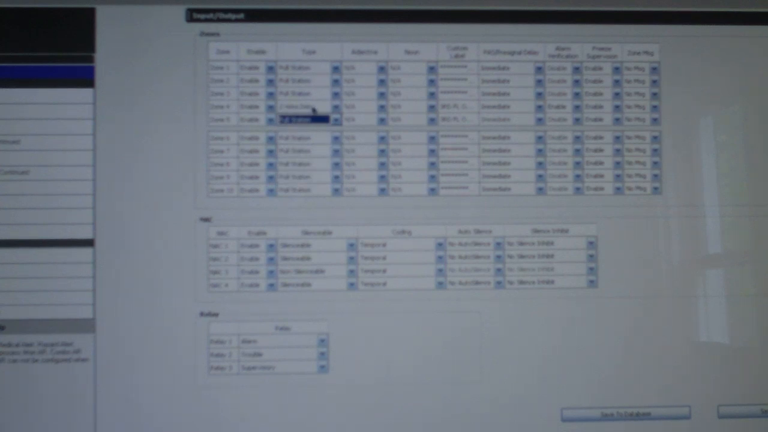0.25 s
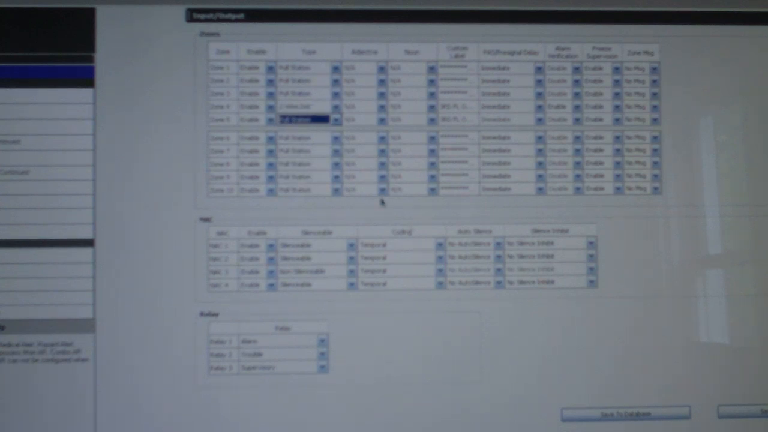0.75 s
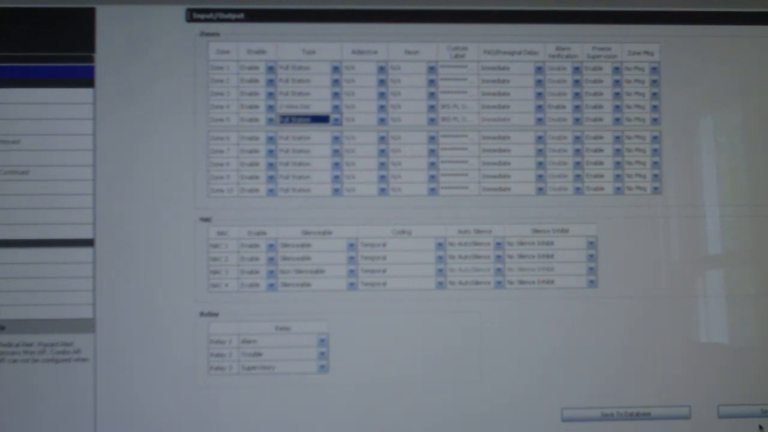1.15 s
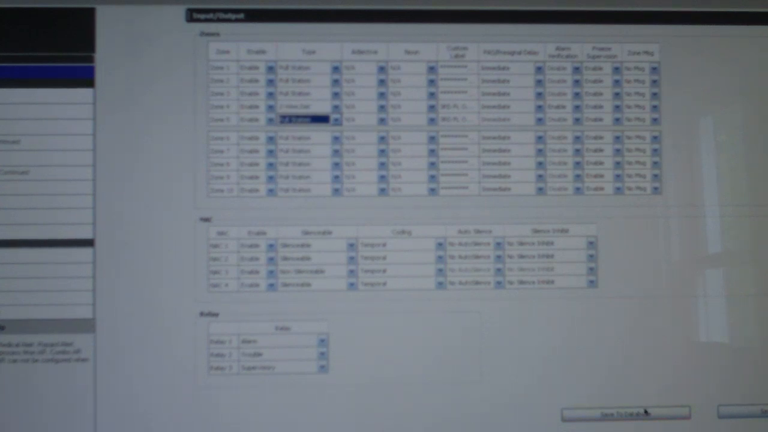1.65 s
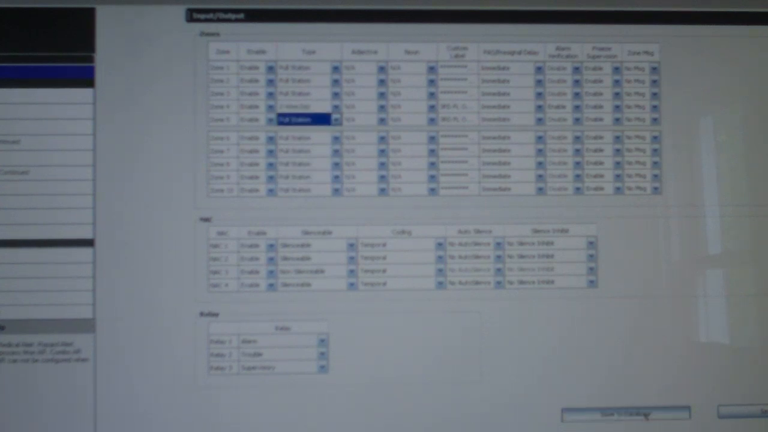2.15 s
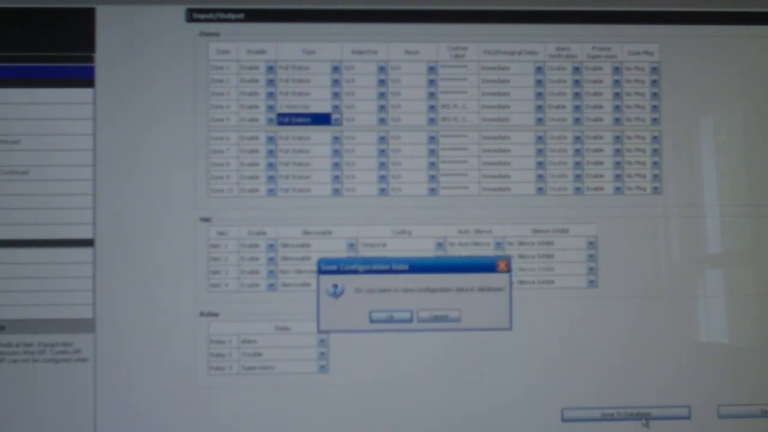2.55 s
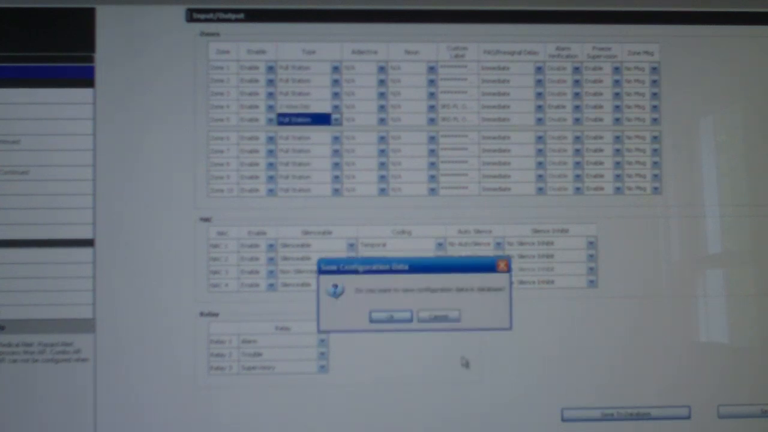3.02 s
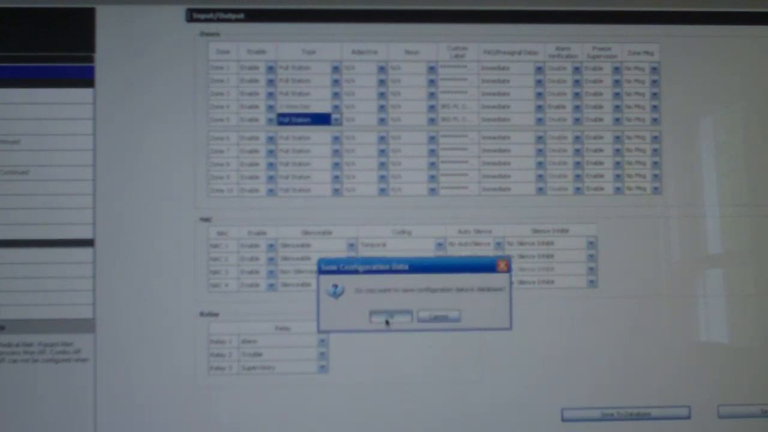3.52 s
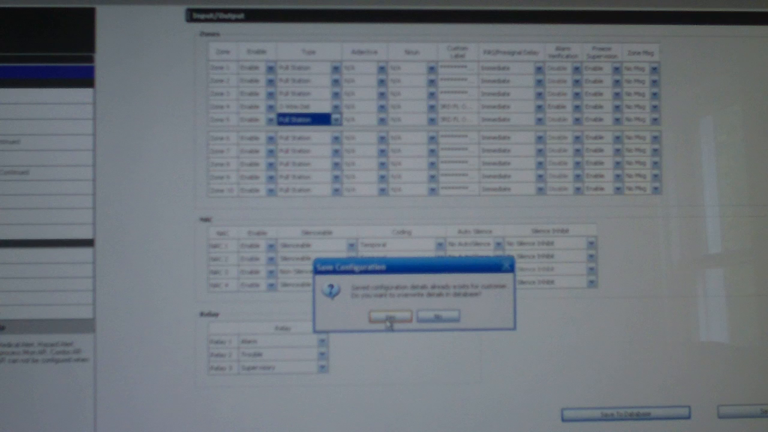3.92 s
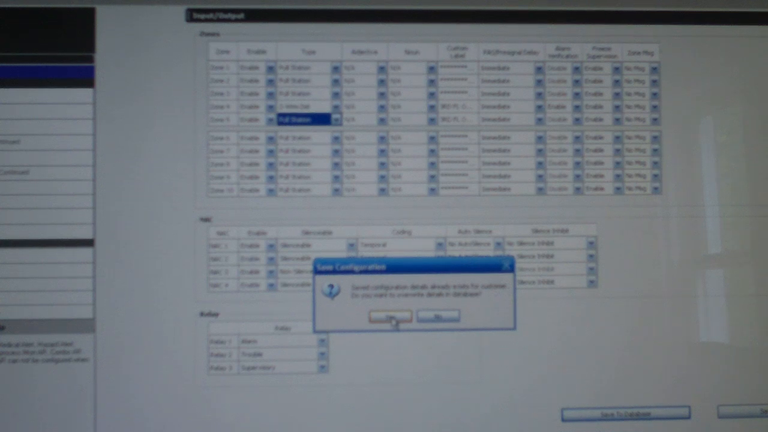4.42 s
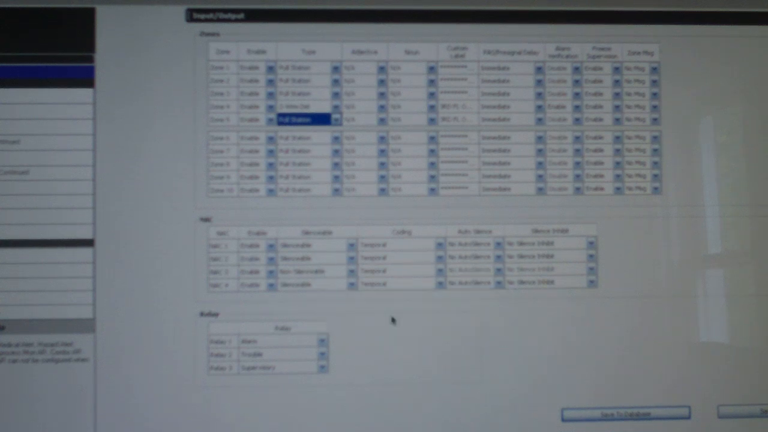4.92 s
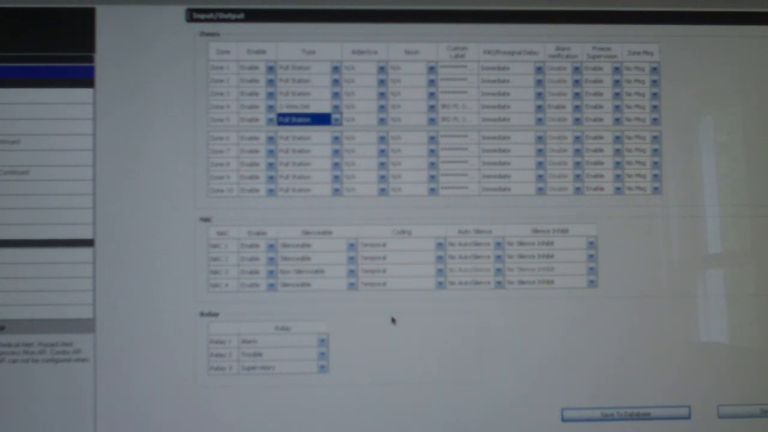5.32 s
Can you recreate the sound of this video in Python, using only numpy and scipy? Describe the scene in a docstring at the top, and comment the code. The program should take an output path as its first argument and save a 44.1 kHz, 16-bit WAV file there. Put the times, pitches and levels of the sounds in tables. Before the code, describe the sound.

In a small quiet office, a computer hums with low fan noise, slow air rumble and a faint high whine with tiny rapid pips. A mouse shuffles on a wooden desk, lands with a solid knock, scrapes briefly, then its button snaps down and up three times at uneven gaps. Close microphone, with short room reflections.

```python
"""Computer mouse on a wooden desk.

In a quiet office a mouse button snaps down and up, and the mouse is nudged, set down and dragged.
Contacts are chattering noise ticks plus decaying shell, spring, desk and hollow resonances in a small room.
Scrapes are grainy coloured noise over desk rumble; soft desk taps and creaks are rough narrow bands.
Filtered noise makes the computer's fans and slow air rumble; sines make mains hum, a whine and regular pips."""
import sys
import numpy as np
from scipy import signal
from scipy.fft import rfft, irfft, next_fast_len
from scipy.io import wavfile
from scipy.ndimage import uniform_filter1d, map_coordinates

SR = 44100
rng = np.random.default_rng(int(sys.argv[2]) if len(sys.argv) > 2 else 0)


def store_wav(level_fs):
    """Save 16-bit WAV to argv[1]."""
    pcm = np.round(np.clip(np.atleast_2d(level_fs), -1, 1) * 32767)
    wavfile.write(sys.argv[1], SR, pcm.T.astype(np.int16))


def elevation(decibels):
    """Turn decibel levels (scalar or array-like) into linear amplitude ratios."""
    levels = np.asarray(decibels, float)
    return 10 ** (levels / 20)


N = 245769


def unit(x):
    """Scale to rms 1."""
    return x / np.sqrt(np.mean(x ** 2) + 1e-20)


def along(points, hz):
    """Interpolate (frequency [Hz], value) points on a log axis."""
    f, v = np.transpose(points)
    return np.interp(np.log(hz + 1), np.log(f + 1), v)


def curve(rows, column=1):
    """One value per sample from (time [s], value, ..) rows."""
    rows = np.array(rows)
    return np.interp(np.arange(N) / SR, rows[:, 0], rows[:, column])


def wobble(rate_hz):
    """Smooth random curve, rate_hz knots a second."""
    knots = rng.standard_normal(int(N * rate_hz / SR) + 4)
    return map_coordinates(knots, [np.arange(N) * rate_hz / SR])


def filtered(x, response):
    """x times a response of frequency."""
    m = next_fast_len(x.shape[-1] + 8192)
    spectrum = rfft(x, m) * response(np.fft.rfftfreq(m, 1 / SR))
    return irfft(spectrum, m)[..., :x.shape[-1]]


def noise(count, colour):
    """Coloured noise of rms 1."""
    return unit(filtered(rng.standard_normal(count), colour))


def humps(table, hz):
    """Gain of resonances standing on a flat floor."""
    return elevation(sum(db / (1 + (2 * (hz - centre) / width) ** 2) for centre, width, db in table))


# first echoes: (delay [s], level [dB])
WALL_ECHOES = [(.0045, -9), (.0098, -17.5), (0.0197, -43)]
# diffuse tail decay: (frequency [Hz], t60 [s])
ROOM_DECAY = [(100, 0.79), (300, 0.4), (900, 0.63), (2500, 0.41), (6000, 0.37), (14000, 0.24)]


def room(x, feed, wet_db):
    """Direct sound with first echoes, and a fresh diffuse tail that dies faster in the treble."""
    hz, t, z = signal.stft(rng.standard_normal(SR // 2), SR, nperseg=256)
    decay = elevation(-60 * t / along(ROOM_DECAY, hz)[:, None])
    tail = signal.istft(z * decay, SR, nperseg=256)[1]
    fade_in = np.clip(np.arange(len(tail)) / (0.0082 * SR), 0, 1)
    tail = elevation(wet_db) * tail / np.linalg.norm(tail) * fade_in
    early = np.zeros(len(tail))
    early[0] = 1
    for delay_s, db in WALL_ECHOES:
        early[round(delay_s * SR)] = elevation(db)
    return signal.fftconvolve(x, early) + signal.fftconvolve(feed, tail)


# fan noise: (frequency [Hz], relative density [dB per Hz])
FAN_SPECTRUM = [(32, -36), (55, 5.5), (122, -8), (148, -8), (242, -13.5), (329, -12.5), (398, -10),
                (458, -16.5), (845, -19), (2070, -23.5), (2870, -25), (4830, -25.5), (6710, -31),
                (7730, -27), (15300, -35.5)]
# case resonances over the fan noise: (frequency [Hz], width [Hz], gain [dB])
CASE_RESONANCES = [(396, 51, 8), (2032, 56, 6.5), (2260, 44, 8), (4830, 240, 6), (5580, 56, 8.5),
                   (7510, 490, 9.5), (8720, 200, 7.5), (10380, 170, 5), (12380, 1300, 7.5), (14950, 92, 19)]
# mains hum: (frequency [Hz], rms level before waver [dB])
HUM_TONES = [(120, -58), (240, -75.5), (360, -75), (480, -80), (600, -81.5)]
# electronic whine: (frequency [Hz], rms level before waver [dB])
WHINE_TONES = [(5001, -85), (7493, -76), (7865, -89), (14987, -83)]


def computer(fans_db=-55, fans_top_hz=15250, waver_db=2.0):
    """Fan noise in the case, mains hum and a steady electronic whine, each tone wavering slightly."""
    t = np.arange(N) / SR

    def fan_colour(hz):
        return elevation(along(FAN_SPECTRUM, hz)) * humps(CASE_RESONANCES, hz) * (hz < fans_top_hz)

    def tone(hz, db):
        level = elevation(db + waver_db * wobble(13))
        return level * np.sqrt(2) * np.sin(2 * np.pi * (hz * t + rng.random()))

    fans = elevation(fans_db + 0.13 * wobble(3.53)) * noise(N, fan_colour)
    hum = sum(tone(hz, db) for hz, db in HUM_TONES)
    whine = sum(tone(hz, db) for hz, db in WHINE_TONES)
    return fans + hum + whine


# air rumble before wobble: (time [s], deep level [dB], upper level [dB])
AIR_LEVELS = [(0.0, -46.5, -52.5), (1.26, -52.5, -60), (1.41, -47, -47.5), (1.86, -46.5, -68),
              (2.2, -43, -43), (2.36, -52, -50.5), (2.67, -44.5, -62), (3.1, -54.5, -51.5),
              (4.02, -41, -51), (4.08, -55.5, -49.5), (4.47, -44.5, -55), (4.67, -53, -50.5),
              (5.51, -43.5, -56), (5.57, -50, -59)]


def air(side_db=-22):
    """Slow air and building rumble swelling along level curves with a small random wobble, slightly stereo."""
    def band(low_hz, high_hz):
        return noise((2, N), lambda hz: 1 / (1 + (low_hz / (hz + 0.11)) ** 8) / (1 + (hz / high_hz) ** 8))

    deep = elevation(curve(AIR_LEVELS, column=1) + 1.7 * wobble(5.5)) * band(10, 21)
    upper = elevation(curve(AIR_LEVELS, column=2) + 1.3 * wobble(5.43)) * band(28, 44)
    mid, side = deep + upper
    return mid + elevation(side_db) * side * [[1], [-1]]


# strokes of scrape and desk rumble, some the ring after a set-down:
# (start [s], loudest [s], stop [s], scrape level [dB], desk rumble level [dB])
STROKES = [(.03, .08, 0.16, -61.5, -80), (0.154, .225, .26, -57.5, -65), (.655, .69, 0.74, -62.5, -59),
           (0.75, 0.773, 0.877, -60.5, -43), (0.806, 0.88, .97, -57.5, -55.5),
           (1.268, 1.276, 1.283, -43.5, -64), (1.274, 1.292, 1.376, -51, -57),
           (2.8, 2.87, 2.96, -62.5, -59.5)]
# scrape: (frequency [Hz], relative density [dB per Hz])
RUB_SPECTRUM = [(290, -42), (500, -16), (740, -5.5), (795, -10), (1320, -7.5), (2260, -11), (2460, -9.5),
                (9920, -12), (14900, -22), (16000, -52)]
# shell resonances over the scrape: (frequency [Hz], width [Hz], gain [dB])
RUB_RESONANCES = [(1350, 270, 3), (1750, 160, 2.5), (4500, 340, 3.5), (6000, 350, 1)]
# dense desk ring, also after each contact: (frequency [Hz], relative density [dB per Hz])
DESK_BODY = [(47, -35), (80, 3), (118, 4), (272, 0), (584, -7.5), (746, -11.5), (1020, -7.5), (1150, -22.5),
             (1490, -20), (1690, -16), (1960, -19), (2100, -25), (2500, -18), (3250, -48), (5500, -120)]
# hollow under the mouse over the rumble: (frequency [Hz], width [Hz], gain [dB])
RUMBLE_RESONANCES = [(600, 130, 2), (900, 350, 7)]


def drag(start_db=-6.5, stop_db=-10, fade_s=.02):
    """Strokes of uneven scraping grains and desk top rumble, each rising to a peak and falling away."""
    def swell(start, loudest, stop):
        return elevation(curve([(start - .002, -80), (start, start_db), (loudest, 0),
                          (stop, stop_db), (stop + fade_s, -80)]))

    swells = [swell(*row[:3]) for row in STROKES]
    scrape_gain = sum(elevation(row[3]) * g for row, g in zip(STROKES, swells))
    rumble_gain = sum(elevation(row[4]) * g for row, g in zip(STROKES, swells))
    scrape = scrape_gain * noise(N, lambda hz: elevation(along(RUB_SPECTRUM, hz)) * humps(RUB_RESONANCES, hz))
    rumble = rumble_gain * noise(N, lambda hz: elevation(along(DESK_BODY, hz)) * humps(RUMBLE_RESONANCES, hz))
    grains = unit(elevation(1.6 * wobble(500) + 3.1 * wobble(61.27)))
    rub = grains * scrape + rumble
    return room(rub, rub, wet_db=-9)[:N]


def pips(pip_hz=7775, base_db=-63, length_s=0.018, stray_db=-5, start_s=.0315, step_s=1.001 / 30):
    """High pips on a clock: every third tick sounds, every fifteenth is skipped, others come by chance."""
    tick = np.arange(int(N / SR / step_s))
    draw = rng.random((len(tick), 3))
    steady = (tick % 3 == 0) & (tick % 15 != 0)
    stray = (tick % 3 != 0) & (draw[:, 0] < .3)
    gain = elevation(base_db + 2.6 * (draw[:, 1] + 1.0)) * (steady + stray * elevation(stray_db))
    centre = start_s + tick * step_s + 0.0058 * draw[:, 2]
    t = np.arange(N) / SR
    near = np.clip(np.round((t - start_s) / step_s).astype(int), 0, len(tick) - 1)
    shape = np.cos(np.pi * np.clip((t - centre[near]) / length_s, -.5, .5))
    return gain[near] * shape * np.sin(2 * np.pi * pip_hz * t)


def ring(modes, t, attack_s):
    """Modes struck together, surface moving away first."""
    tones = 0
    for hz, db, t60 in modes:
        tones = tones + elevation(db + rng.normal(0, 0.97) - 60 * t / t60) * np.sin(2 * np.pi * hz * t)
    return -tones * (1 - np.exp(-t / attack_s))


# hollow under the mouse: (frequency [Hz], relative level [dB], t60 [s])
HOLLOW_MODES = [(617.6, -1.5, 0.043), (784, -4.5, 0.053), (900, -1, 0.036), (945, -19, 0.067),
                (1350, -31, 0.082)]
# switch leaf spring: (frequency [Hz], relative level [dB], t60 [s])
SPRING_MODES = [(4440, -4, 0.1), (5010, -2, 0.14), (5890, -7, 0.16), (12400, -5, .15), (13500, -9, .12)]


def contact(spectrum, shell, desk, hold_s, spring_db, tick_db, thump_db, knock_db, t60, dull_db):
    """Chattering tick, spring ring, desk thump and hollow knock, as the room returns them."""
    t = np.arange(SR // 4) / SR

    def colour(hz):
        tilt_db = dull_db * np.log2((hz + 1) / 3000)  # dull_db per octave
        return elevation(along(spectrum, hz) - tilt_db) * humps(shell, hz)

    def high(hz):
        return 1 / (1 + (5500 / (hz + 1)) ** 4)

    # parts rattle and rebound; the rattle lasts hold_s before it fades, the treble dies sooner
    chatter = elevation(2.2 * map_coordinates(rng.standard_normal(300), [t * 900], mode="wrap"))
    grit = chatter * rng.standard_normal(len(t)) * (1 - np.exp(-t / .0007))
    low_fade = elevation(-60 * np.maximum(t - hold_s, 0) / t60)
    high_fade = elevation(3.5 - 60 * np.maximum(t - 0.44 * hold_s, 0) / (0.94 * t60))
    tick = filtered(grit * low_fade, lambda hz: colour(hz) * (1 - high(hz)))
    tick = tick + filtered(grit * high_fade, lambda hz: colour(hz) * high(hz))
    size = elevation(tick_db) * np.sqrt(t60 * SR / (2 * np.log(1000)))
    # over all directions the tick has a smooth colour
    spread = filtered((np.arange(len(t)) == 200) * 1., colour)

    thump = elevation(thump_db) * ring(desk, t, attack_s=0.0019)
    knock = elevation(knock_db) * ring(HOLLOW_MODES, t, attack_s=0.0013)
    body_gain = elevation(thump_db - 10.5 - 60 * t / .3) * (1 - np.exp(-t / 0.0085))
    body = body_gain * noise(len(t), lambda hz: elevation(along(DESK_BODY, hz)))
    spring_gain = elevation(tick_db + spring_db + 5.4 * wobble(310)[:len(t)])
    spring = spring_gain * ring(SPRING_MODES, t, attack_s=0.0019)
    rings = thump + knock + body + spring
    direct = size * tick / np.linalg.norm(tick) + rings
    feed = size * spread / np.linalg.norm(spread) + rings
    return room(direct, feed, wet_db=-10.5)


# mouse base meets desk: (time [s], tick [dB], desk thump [dB], chatter t60 [s], dullness [dB per octave])
BASE_BUMPS = [(.112, -49.5, -73, .024, -3), (.529, -50.5, -56, .017, -6), (0.6429, -34, -50, 0.031, 2.5),
              (.732, -23, -24, 0.033, -0.36), (1.269, -43, -55, .02, -6.5), (1.703, -39.5, -45.5, 0.038, 3)]
# button goes down: (time [s], strength [dB], finger lands earlier by [s])
BUTTON_PRESSES = [(2.0945, -22, 0.0019), (3.535, -22.5, 0.0053), (4.6327, -24, .0058)]
# button comes up: (time [s], strength [dB])
BUTTON_RELEASES = [(2.164, -28), (3.6105, -29), (4.712, -29.5)]
# against the strength: (snap [dB], desk thump [dB], hollow knock [dB], chatter t60 [s], dullness [dB per octave])
FINGER_LANDING = (-16, -25, -29, .02, 2)
DOWN_SNAP = (0.4, -1.3, -4.5, 0.0144, 1.9)
UP_SNAP = (0, -10.5, -9.5, 0.0243, 0)
# tick colours of down snap, up snap, base bump: (frequency [Hz], relative density [dB per Hz])
DOWN_SPECTRUM = [(710, -24), (1200, -2.5), (1480, -17), (3280, -1), (3900, -4), (4300, 0), (8110, -3.5),
                 (13700, 2.5), (15600, -11), (16300, -44)]
UP_SPECTRUM = [(710, -45), (1200, -6.5), (2050, -17.5), (2470, -25), (2870, -4), (3350, -10), (4350, -1.5),
               (5300, -6), (8020, -10.5), (11300, -5.5), (12300, 0), (14900, -10.5), (16300, -43)]
BUMP_SPECTRUM = [(590, -22), (1000, -4), (1440, -14), (2700, -7.5), (3110, -12), (4510, -13), (6790, -20.5),
                 (12300, -20.5), (14900, -27), (16300, -50)]
# shell resonances over the snap: (frequency [Hz], width [Hz], gain [dB])
SHELL_RESONANCES = [(1940, 260, 10), (2170, 470, 7.5), (2790, 83, 1.5), (4440, 430, 6), (4630, 180, 1),
                    (6450, 200, 2), (7330, 360, 2.5), (10500, 790, 4.5), (13500, 1100, 4.5),
                    (14700, 660, 4)]
# desk top modes: (frequency [Hz], relative level [dB], t60 [s])
DESK_MODES = [(117.4, -2, 0.053), (134.7, -3.5, 0.11), (213.3, -11.5, 0.11), (284.6, -10.5, 0.21),
              (350.6, 1.5, 0.099), (504.5, -23, 0.13)]


def mouse(bump_knock_db=0.5):
    """Switch snaps ring the shell and spring; bumps are plain and drive the desk's low modes harder."""
    def struck(s, db, rule):
        snap, thump, knock, t60, dull = rule
        return s, db + snap, db + thump, db + knock, t60, dull

    heavy = [(hz, db - 3 * np.log2(hz / 200), t60) for hz, db, t60 in DESK_MODES]
    down = [struck(s - early, db, FINGER_LANDING) for s, db, early in BUTTON_PRESSES]
    down += [struck(s, db, DOWN_SNAP) for s, db, _ in BUTTON_PRESSES]
    up = [struck(s, db, UP_SNAP) for s, db in BUTTON_RELEASES]
    bumps = [(s, tick, thump, thump + bump_knock_db, t60, dull) for s, tick, thump, t60, dull in BASE_BUMPS]
    # (blows, spectrum, shell, desk, hold [s], spring against tick [dB])
    kinds = [(down, DOWN_SPECTRUM, SHELL_RESONANCES, DESK_MODES, .005, -28),
             (up, UP_SPECTRUM, SHELL_RESONANCES, DESK_MODES, .004, -19),
             (bumps, BUMP_SPECTRUM, [], heavy, .002, -60)]
    out = np.zeros(N + SR)
    for blows, *kind in kinds:
        for s, *blow in blows:
            heard = contact(*kind, *blow)
            start = round(s * SR)
            out[start:start + len(heard)] += heard
    return out[:N]


# soft desk taps near 900 Hz and higher creaks: (centre time [s], gain [dB], frequency [Hz], length [s])
TAPS_AND_CREAKS = [(0.492, -60, 900, 0.021), (0.912, -54, 1750, 0.071), (1.291, -50.5, 1354, 0.057),
                   (1.332, -54, 1350, 0.11), (2.585, -55.5, 900, 0.027), (2.822, -59, 950, 0.034),
                   (2.875, -51, 925, 0.062), (3.18, -61, 915, 0.056), (3.22, -60, 930, 0.05),
                   (5.255, -50, 873, 0.042), (5.419, -53, 900, 0.028)]


def taps_and_creaks():
    """Soft desk taps near 900 Hz and higher creaks: each swells and fades in a narrow band."""
    t = np.arange(N) / SR
    out = np.zeros(N)
    for s, db, hz, length_s in TAPS_AND_CREAKS:
        swell = np.cos(np.pi * np.clip((t - s) / length_s, -.5, .5))
        rough = noise(N, lambda f: 1 / (1 + ((f - hz) / 70) ** 2))
        out += elevation(db) * swell * (0.24 * np.sin(2 * np.pi * hz * t) + .5 * rough)
    return out


def scene():
    """Everything at the microphone."""
    return computer() + air() + drag() + pips() + mouse() + taps_and_creaks()


def band_limit(x):
    """A steep low-pass at the top of the band."""
    return signal.sosfilt(signal.butter(12, 16460, fs=SR, output="sos"), x)


# channel difference noise: (frequency [Hz], relative density [dB per Hz])
DIFFERENCE_SPECTRUM = [(35, -34), (60, 1.5), (71, -10), (102, 2.5), (120, -22), (152, -26), (383, -35),
                       (2040, -31), (11900, -28), (15300, -34.5)]


def record(dry, base_db=-67.5, offset=.0221):
    """Channel difference: steady offset (full scale 1) and faint noise, opposite in the two channels."""
    treble = filtered(dry.mean(axis=0), lambda hz: hz > 1000)
    loud = np.abs(uniform_filter1d(treble ** 2, size=1024)) / elevation(-55) ** 2
    faint = elevation(base_db) * noise(N, lambda hz: elevation(along(DIFFERENCE_SPECTRUM, hz)))
    low = filtered(faint, lambda hz: 1 / (1 + (hz / 600) ** 4))
    bass = filtered(low, lambda hz: 1 / (1 + (hz / 140) ** 4))
    # while the sound is loud the difference widens in the low middle and narrows above
    low_middle = (low - bass) * (1 + loud) ** 0.64
    upper = (faint - low) / (1 + loud ** 3)
    difference = bass + low_middle + upper + offset
    return band_limit(dry + difference * [[1], [-1]])


dry = scene()
out = record(dry)
store_wav(out)
```